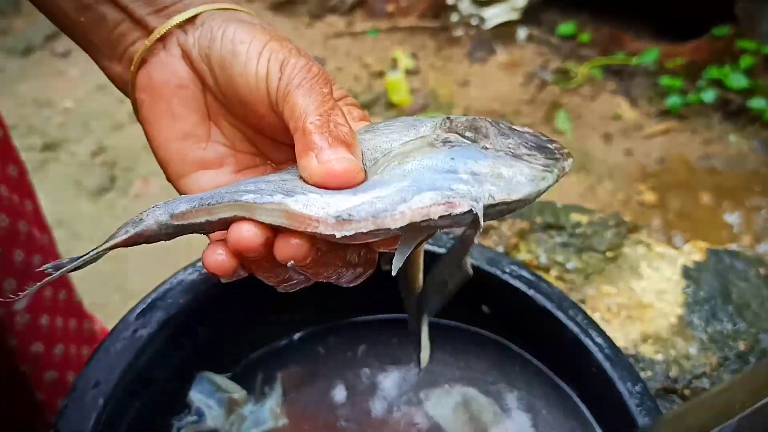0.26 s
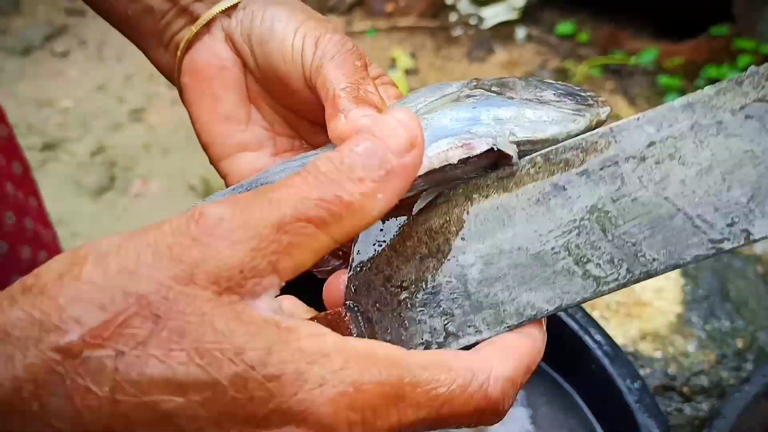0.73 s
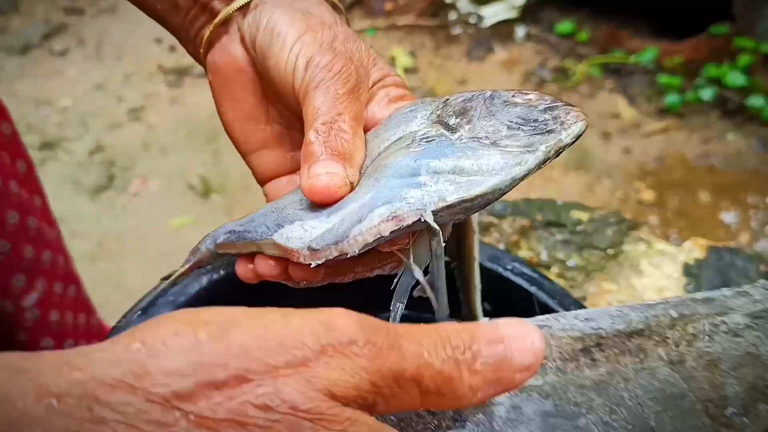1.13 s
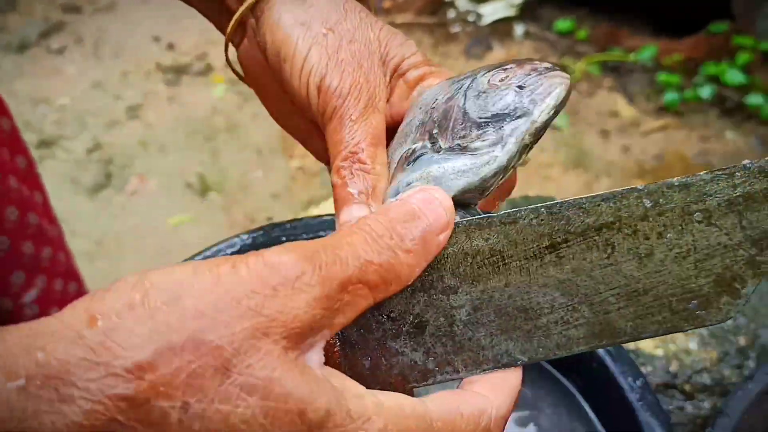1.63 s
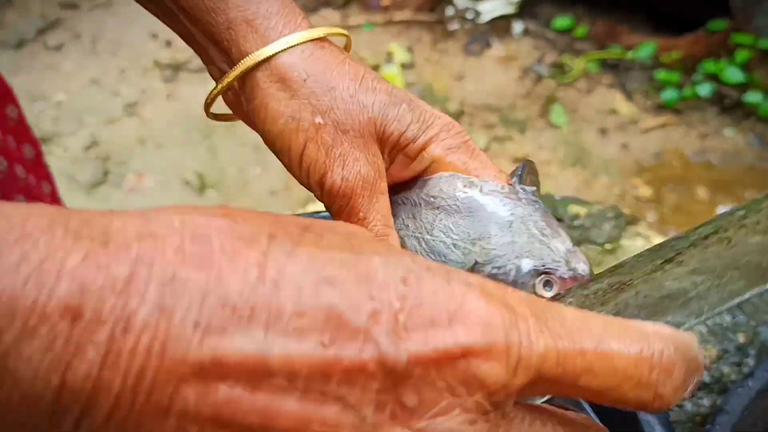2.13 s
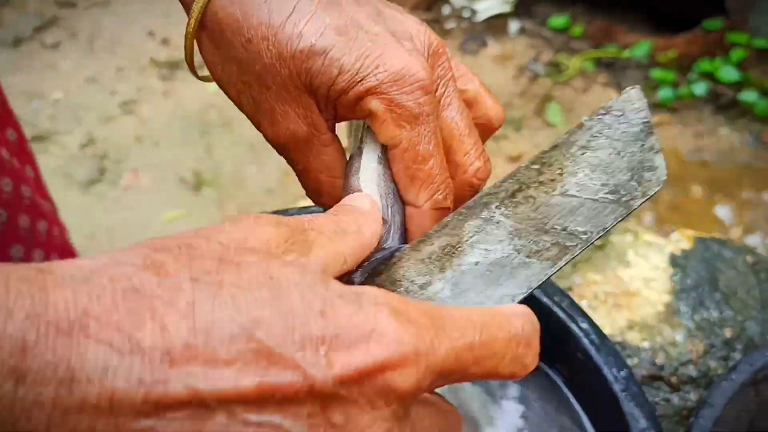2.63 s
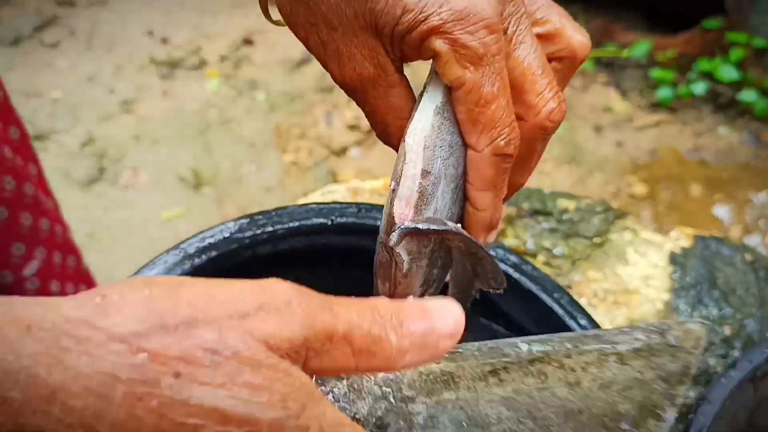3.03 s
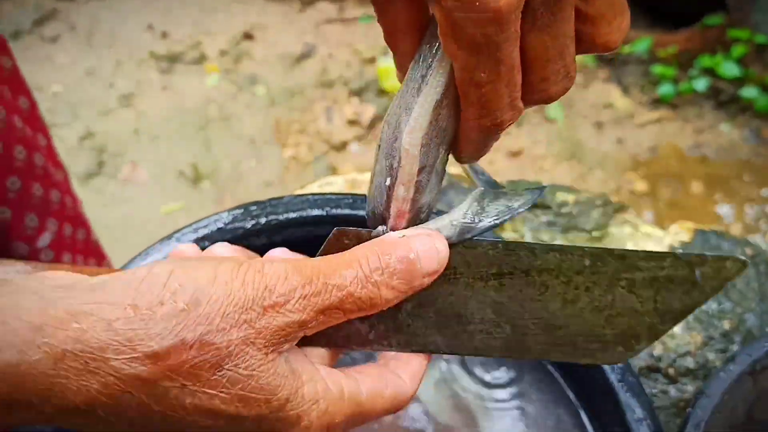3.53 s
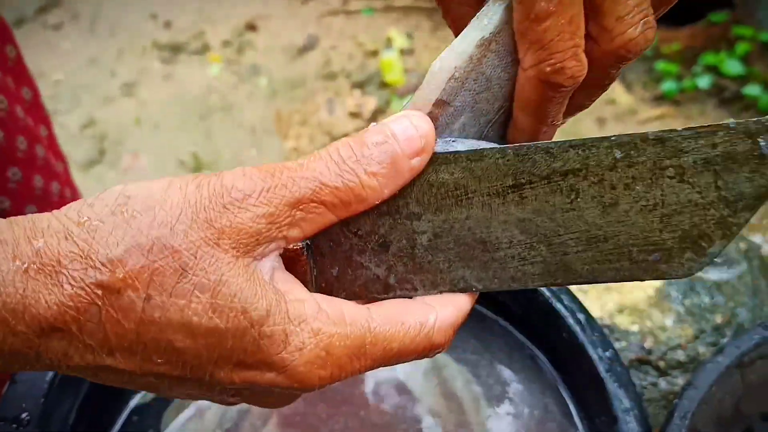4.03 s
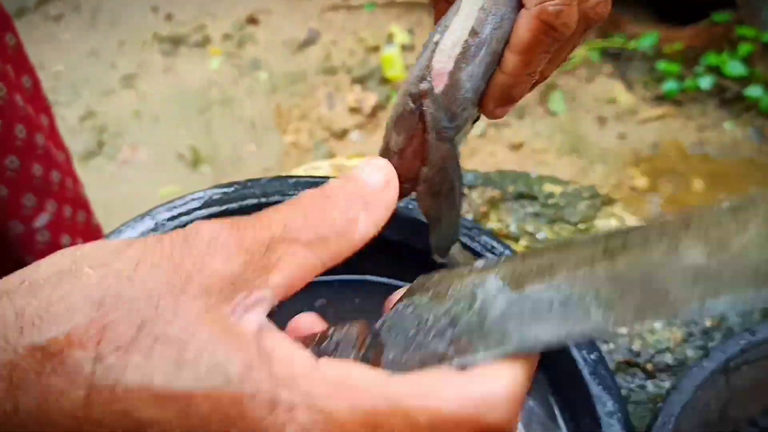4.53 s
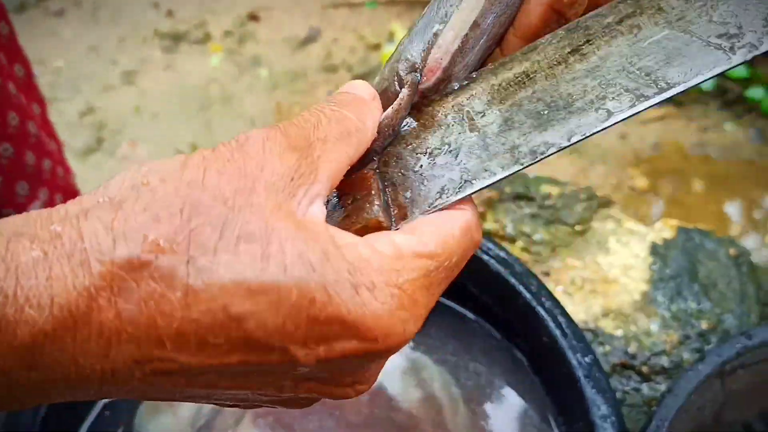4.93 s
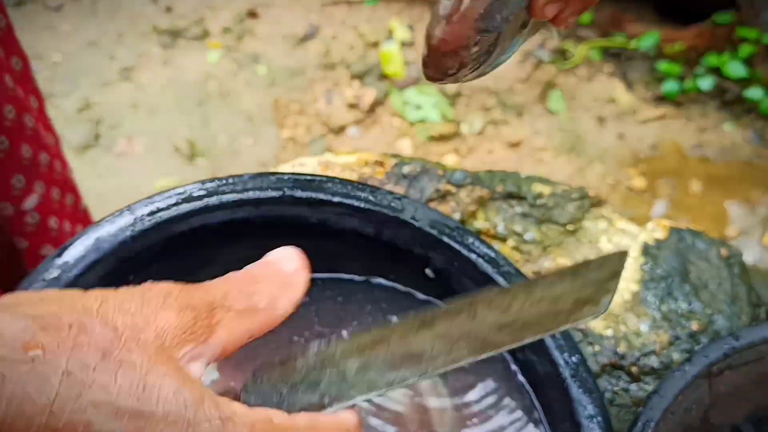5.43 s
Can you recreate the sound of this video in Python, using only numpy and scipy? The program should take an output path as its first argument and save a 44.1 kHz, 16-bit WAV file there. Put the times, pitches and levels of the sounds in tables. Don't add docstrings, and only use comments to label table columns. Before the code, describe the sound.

A near microphone catches hard scraping and bright brittle snaps of fish scales and fins under a steel blade, loudest at the start. Tiny water drops, faint grazes and another cluster of cracks follow, then mostly quiet with isolated clicks. Far insects shimmer steadily, a nearer one pulses about three times a second, and a low outdoor hush lies beneath.

```python
import sys
import numpy as np
from scipy import signal
from scipy.fft import rfft, irfft
from scipy.io import wavfile
from scipy.ndimage import uniform_filter1d

SR = 44100
rng = np.random.default_rng(int(sys.argv[2]) if len(sys.argv) > 2 else 0)


def ratio_of_db(decibels):
    return 10 ** (np.asarray(decibels, float) / 20)


def wav_record(signal):
    frames = np.transpose(np.atleast_2d(signal))
    bounded = np.clip(frames, -1, 1)
    quanta = np.round(bounded * 32767).astype(np.int16)
    wavfile.write(sys.argv[1], SR, quanta)


N = 250488

# (frequency [Hz], density [dB per Hz])
YARD_SPECTRUM = [(15, -46), (25, -24), (40, -21), (52, -6.5), (85, -2.5), (140, 1), (200, -2.5), (275, -7),
                 (390, -6), (460, -9.5), (750, -9.5), (1000, -15.5), (2100, -12.5), (16000, -23.5)]
YARD_LEVEL_DB = -54
# (time [s], level [dB])
CHORUS_LEVEL = [
    (0, -64),
    (2, -69.5),
    (4.4, -68),
    (5.68, -78),
]
CHORUS_HZ, CHORUS_WIDTH_HZ = 5830, 790
# (start [s], length [s], level [dB], pitch [Hz])
SCRAPES = [
    (-.012, 0.061, -31.5, 3270),
    (-0.5, 0.054, -35, 4800),
    (0.026, .046, -40, 2870),
    (0.131, .11, -52, 3780),
    (1.846, 0.13, -57.5, 430),
    (1.851, 0.063, -45.5, 4770),
    (1.855, 0.039, -41.5, 2280),
    (1.899, 0.11, -58.5, 3000),
    (1.903, 0.017, -50, 3300),
    (5.61, 0.055, -58, 2980),
]
SCRAPE_SPRAY_DB, SCRAPE_RING_DB = -12, -10.5
# (start [s], length [s], level [dB], wet spray [dB], blade ring [dB])
GRAZES = [(.896, 0.051, -55, -2, 0), (0.923, 0.029, -54, -2, -6), (1.205, .035, -63, 0, -6),
          (1.42, .025, -65, -3, 4), (1.485, .064, -62, -4, -2), (1.543, 0.033, -54, -9, -1),
          (1.765, .035, -60, -2, -9), (2.065, 0.088, -65, 6, -4), (2.137, .049, -64, 10.5, -9),
          (3.338, 0.058, -67, 5, 0), (4.077, .03, -70, 2, -4), (4.26, .043, -63, -7, -8),
          (4.53, 0.022, -62, -1, -4), (4.68, .027, -69, 5, -4), (5.029, 0.034, -64.5, -7, 0),
          (5.11, .055, -62, -11, -2)]
GRAZE_HZ = 3750
GRAINS_PER_S, GRAIN_SCATTER_DB = 3700, -2
STROKE_WIDTH_SHARE, STROKE_SWELL_SHARE = 0.53, 0.7
# (time [s], peak [dB], pitch [Hz], wet spray [dB])
SNAPS = [(.0024, -25, 3450, -21), (.017, -23, 2110, -20), (.0218, -17, 4670, -23.5),
         (0.0267, -21, 3470, -18), (0.036, -24, 4200, -17), (0.0448, -13.5, 4260, -18.5),
         (0.053, -21, 2900, -14), (.0561, -23.5, 4130, -8), (0.1738, -30, 3750, -34),
         (1.5633, -37, 3510, -28), (1.7683, -39, 4100, -16), (1.7749, -32.5, 3850, -12.5),
         (1.7885, -37, 3100, -18), (1.863, -35, 2370, -20), (1.8697, -33, 3350, -20),
         (1.8735, -34, 2720, -8), (1.8778, -24.5, 3390, -20), (1.8824, -32, 2840, -25),
         (1.8866, -31, 3330, -21), (1.892, -31.5, 2880, -28), (1.9084, -23, 2596, -21),
         (1.9103, -28, 3620, -14), (1.9139, -28.5, 4400, -20), (4.296, -30, 3920, -16),
         (4.301, -38, 3930, -24), (5.6096, -26.5, 2350, -23), (5.6134, -29, 4350, -30),
         (5.6163, -33.5, 3880, -31)]
SNAP_T60_S, SNAP_CRACK_DB = 0.0093, -1
# (time [s], peak [dB], pitch [Hz], wet spray [dB])
TICKS = [(0.912, -47, 3990, -6), (1.127, -54, 3000, -10), (1.5542, -50, 3930, -15),
         (1.5783, -44, 3960, -17), (1.7903, -34.5, 4360, -23), (1.904, -40, 4000, -18),
         (1.9477, -40, 3900, -26), (1.9841, -49, 2820, -22), (2.091, -54, 4000, -10),
         (2.1057, -48, 3150, -5), (2.326, -52, 3600, -6), (3.008, -43, 2700, -31), (4.2, -45, 3200, -18),
         (4.205, -50, 4220, -12), (4.215, -49, 2600, -12), (4.288, -42, 2800, -21),
         (4.5391, -42, 3690, -21), (5.556, -46, 4100, -9), (5.569, -50, 3500, -8), (5.585, -44, 3970, -10)]
TICK_T60_S, TICK_CRACK_DB = 0.0075, 2
# (time [s], peak [dB], pitch [Hz], decay [s])
TWANGS = [(0.028, -19, 5025, 0.059), (0.0434, -25, 5280, .017), (.0471, -19.5, 4950, .016),
          (0.1739, -23.5, 1380, 0.0091), (0.1738, -41, 1020, .014), (1.5633, -43, 1700, .015),
          (1.8787, -30, 1610, 0.0094), (1.8782, -32, 5600, .013), (1.911, -35, 2500, 0.021),
          (2.812, -41.5, 3040, .012), (2.819, -41.5, 3430, 0.027), (2.829, -47, 3150, 0.035),
          (2.914, -50, 2870, .012), (4.2954, -38.5, 2080, 0.03), (4.295, -35, 4720, 0.014),
          (4.539, -42, 5470, .02), (5.6097, -29, 4160, 0.0053)]
TWANG_SPRAY_DB, TWANG_CRACK_DB = -29, -9
LEAD_S = .0004
# (frequency [Hz], level [dB], decay [s])
BLADE_MODES = [(2900, -9, .04), (3100, -9, .06), (3470, -1, .05), (3978, 0, .07), (4220, -6, .04),
               (5030, -8, .04), (8880, -2, .05), (9450, -8, .04), (10220, -2, .045), (10750, -5, .035),
               (11300, -6, .03), (11800, -3, .03)]
# (time [s], peak [dB], frequency [Hz], decay [s])
KNOCKS = [(.004, -35, 620, .06), (.012, -36, 190, .12), (.02, -39, 390, .07), (.028, -38, 900, .04),
          (.04, -34, 640, .06), (.038, -33, 1580, .04), (.04, -31, 2030, .06), (.052, -32, 1400, .03),
          (1.872, -40, 330, .05), (1.876, -40, 800, .03), (1.903, -33, 180, .08), (1.905, -42, 450, .04),
          (1.938, -35, 220, .07), (1.94, -43, 490, .04)]
# (time [s], peak [dB], frequency [Hz], decay [s])
RINGS = [(.006, -27, 2100, .14), (.058, -21, 8840, .055), (.058, -38, 3100, .08), (.059, -32, 3978, .085),
         (.927, -43, 3470, .07), (.93, -47, 3980, .08), (.937, -44, 3470, .06), (.942, -44, 10220, .04),
         (1.421, -49, 10220, .06), (2.15, -48, 4010, .08), (2.15, -46, 8880, .07), (3.37, -48, 8880, .06)]
# (time [s], peak [dB], pitch [Hz], decay [s])
DROPS = [
    (.2144, -47, 2610, .046),
    (0.3053, -46, 2570, 0.066),
]
DROP_RISE = .1
# (time of peak [s], level [dB])
CHIRPS = [(.27, -62), (.62, -64.5), (.93, -76), (1.25, -64), (1.57, -72), (1.88, -71), (2.19, -63),
          (2.57, -65), (2.97, -67), (3.31, -67), (3.7, -65), (4.05, -66), (4.4, -66), (4.84, -66),
          (5.17, -65), (5.5, -66)]
CHIRP_HZ, CHIRP_WIDTH_HZ, CHIRP_RISE_S, CHIRP_FALL_S = 4690, 670, 0.028, 0.061
# (frequency [Hz], gain [dB])
MIC_COLOUR = [(1500, 2), (2200, 0), (2800, 4.5), (3500, 3.5), (4200, 3.5), (5200, -4), (6100, -6.5),
              (6900, -18), (7800, -20.5), (9000, -17), (10800, -9.5), (12300, -15.5), (15500, -14)]
TOP_HZ = 15650


def curve(points, hz):
    f, db = np.transpose(points)
    return np.interp(np.log(np.maximum(hz, 1)), np.log(f), db)


def unit(x):
    return x / np.sqrt(np.mean(x ** 2))


def add(out, s, x):
    i = int(s * SR)
    x, i = x[max(-i, 0):], max(i, 0)
    out[i:i + len(x)] += x[:N - i]


def band(x, hz, width):
    return signal.lfilter(*signal.iirpeak(hz, hz / width, fs=SR), x)


def narrow(x, hz, width):
    return unit(band(band(x, hz, width), hz, width))


def between(x, low_hz, high_hz):
    return signal.sosfilt(signal.butter(2, [low_hz, high_hz], "band", fs=SR, output="sos"), x)


def treble(x):
    return between(x, 8950, 12700)


def walk(rate):
    k = int(SR / rate)
    held = np.repeat(rng.standard_normal(N // k + 1), k)
    return 1.8 * uniform_filter1d(uniform_filter1d(held, k), k)[:N]


def yard(count=11):
    hz = np.fft.rfftfreq(N, 1 / SR)
    spread = rfft(rng.standard_normal(N)) * ratio_of_db(curve(YARD_SPECTRUM, hz))
    octave = np.log2(np.maximum(hz, 30) / 30)
    out = np.zeros(N)
    swell = walk(1.5)
    for k in range(count):
        share = np.clip(1 - np.abs(octave - k), 0, 1)
        flicker = walk(9)
        out += irfft(spread * share, N) * ratio_of_db(.3 * swell + .5 * flicker)
    return unit(out) * ratio_of_db(YARD_LEVEL_DB)


def chorus():
    db = np.interp(np.arange(N) / SR, *np.transpose(CHORUS_LEVEL))
    return ratio_of_db(db) * narrow(rng.standard_normal(N), CHORUS_HZ, CHORUS_WIDTH_HZ)


def strokes():
    caught = rng.random(N) < GRAINS_PER_S / SR
    scatter = ratio_of_db(GRAIN_SCATTER_DB * rng.exponential(size=N))
    grains = np.clip(caught * rng.standard_normal(N) * scatter, -12, 12)
    grains = unit(unit(grains) + .5 * rng.standard_normal(N))
    sound, force = np.zeros(N), np.zeros(N)
    rows = [(*row, SCRAPE_SPRAY_DB, SCRAPE_RING_DB) for row in SCRAPES]
    rows += [(s, length, db, GRAZE_HZ, *wet) for s, length, db, *wet in GRAZES]
    for s, length, db, hz, spray_db, ring_db in rows:
        i, n = max(int(s * SR), 0), int(length * SR)
        push = grains[i:i + n]
        pressure = ratio_of_db(db - 6.5) * signal.windows.tukey(len(push), STROKE_SWELL_SHARE)
        rasp = narrow(push, hz, hz * STROKE_WIDTH_SHARE)
        spray = ratio_of_db(spray_db + 6.5) * unit(treble(push))
        add(sound, s, pressure * (rasp + spray))
        add(force, s, pressure * ratio_of_db(ring_db - 17.0) * push)
    return sound, force


def snaps(size=1800):
    sound, force, t = np.zeros(N), np.zeros(N), np.arange(size) / SR
    rows = [(*row, SNAP_T60_S, SNAP_CRACK_DB) for row in SNAPS]
    rows += [(*row, TICK_T60_S, TICK_CRACK_DB) for row in TICKS]
    rows += [(s, db, hz, TWANG_SPRAY_DB, t60, TWANG_CRACK_DB) for s, db, hz, t60 in TWANGS]
    for s, db, hz, spray_db, t60, crack_db in rows:
        noise = rng.standard_normal(size)
        fade = ratio_of_db(-60 * (t / t60) ** 1.5) * (1 - np.exp(-t / .00012))
        roughness = 1 + .33 * unit(band(noise, 500, 800))
        twang = np.sin(2 * np.pi * hz * t) * fade * roughness
        crack = between(noise * ratio_of_db(-60 * t / 0.007) + 3.8 * (t == 0), 1670, 6500)
        crack = 0.78 * crack / np.abs(crack).max()
        spray = treble(noise[::-1]) * fade ** 0.97
        snap = twang + ratio_of_db(crack_db + 4.5) * crack + ratio_of_db(spray_db + 21.5) * spray
        add(sound, s - LEAD_S, ratio_of_db(db - 6) * snap)
        add(force, s, ratio_of_db(db - 44.5) * noise * np.exp(-t / .00005))
    return sound, force


def blade(force):
    out = np.zeros(N)
    for hz, db, t60 in BLADE_MODES:
        pole = np.exp(2j * np.pi * hz / SR - np.log(1000) / (t60 * SR))
        out += ratio_of_db(db) * signal.lfilter([1], [1, -pole], force).imag
    return out


def fading_tones(rows, rise, size=6000):
    out, t = np.zeros(N), np.arange(size) / SR
    for s, db, hz, t60 in rows:
        phase = 2 * np.pi * hz * (t + rise * t ** 2 / (2 * t60))
        onset = 1 - np.exp(-t * hz / 2)
        add(out, s, ratio_of_db(db - 4.5 - 60 * t / t60) * onset * np.sin(phase))
    return out


def knocks():
    return fading_tones(KNOCKS, 0)


def rings():
    return fading_tones(RINGS, 0)


def drops():
    return fading_tones(DROPS, DROP_RISE)


def insect():
    t, effort = np.arange(N) / SR, np.zeros(N)
    for s, db in CHIRPS:
        slope = np.where(t < s, CHIRP_RISE_S, CHIRP_FALL_S)
        effort += ratio_of_db(db) * np.exp(-((t - s) / slope) ** 2 / 2)
    return effort * narrow(rng.standard_normal(N), CHIRP_HZ, CHIRP_WIDTH_HZ)


def basin_blur(near, size=3000):
    t = np.arange(size) / SR
    blur = rng.standard_normal(size) * ratio_of_db(-60 * t / .05) * (t > .002)
    return ratio_of_db(-16.5) * signal.fftconvolve(near, blur / np.linalg.norm(blur))[:N]


def scene():
    rasp, drag = strokes()
    snap, kick = snaps()
    near = rasp + snap + blade(drag + kick) + knocks() + rings() + drops()
    near = near + basin_blur(near)
    return (yard() + chorus() + near + insect())[None]


def band_limit(x):
    return signal.sosfilt(signal.butter(12, 16610, fs=SR, output="sos"), x)


def record(dry, size=2048):
    cepstrum = irfft(np.log(ratio_of_db(curve(MIC_COLOUR, np.fft.rfftfreq(size, 1 / SR)))))
    cepstrum[1:size // 2] *= 2
    cepstrum[size // 2 + 1:] = 0
    response = irfft(np.exp(rfft(cepstrum)))
    heard = signal.fftconvolve(dry, response[None, :size // 2])[:, :N]
    edge = signal.ellip(10, .2, 60, TOP_HZ, fs=SR, output="sos")
    return band_limit(signal.sosfilt(edge, heard))


dry = scene()
out = record(dry)
wav_record(out)
```